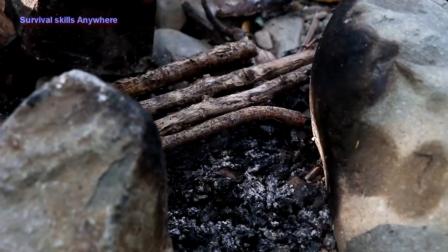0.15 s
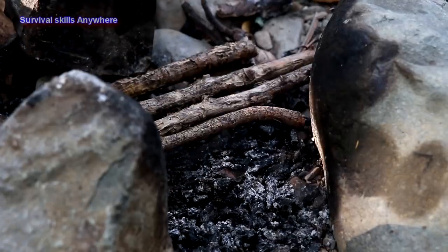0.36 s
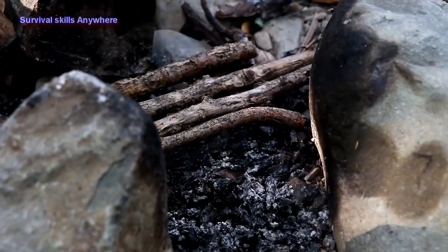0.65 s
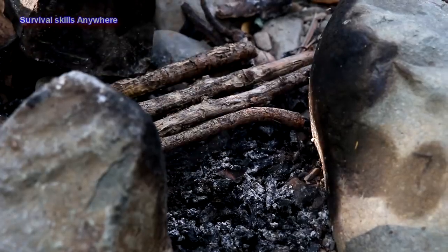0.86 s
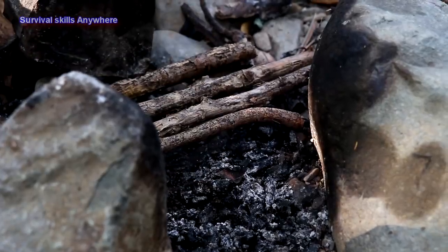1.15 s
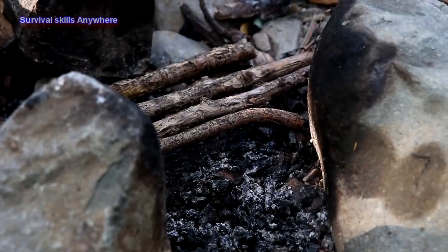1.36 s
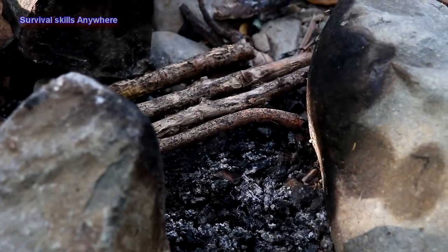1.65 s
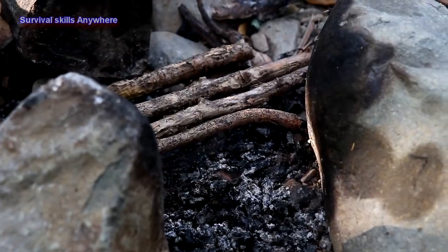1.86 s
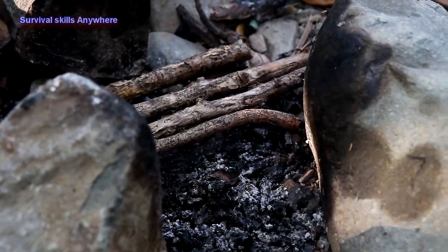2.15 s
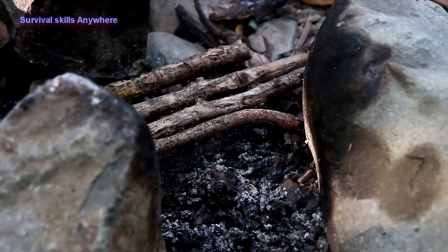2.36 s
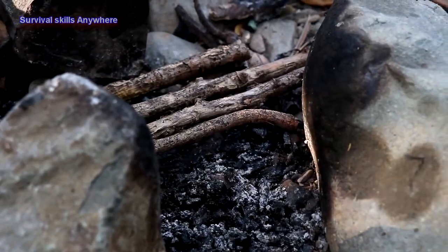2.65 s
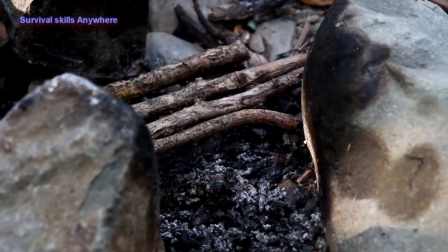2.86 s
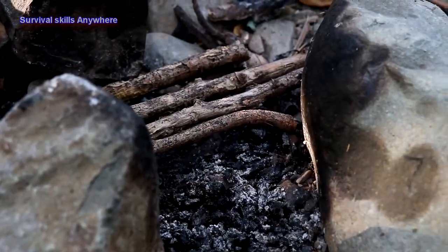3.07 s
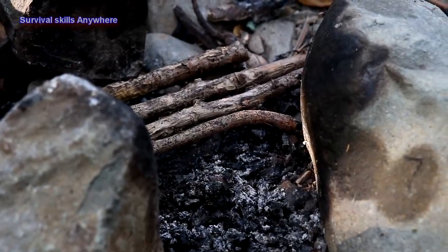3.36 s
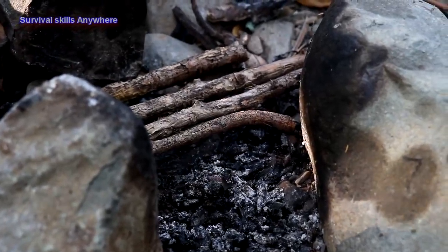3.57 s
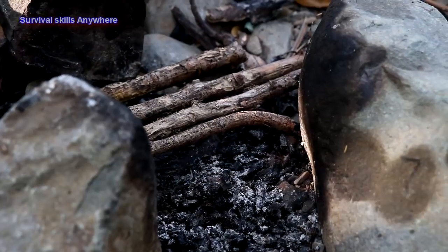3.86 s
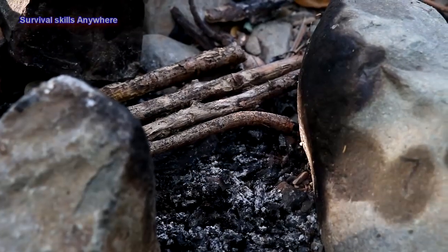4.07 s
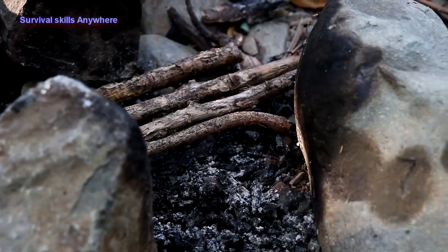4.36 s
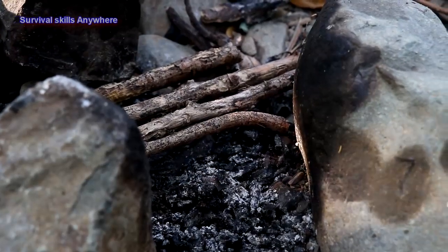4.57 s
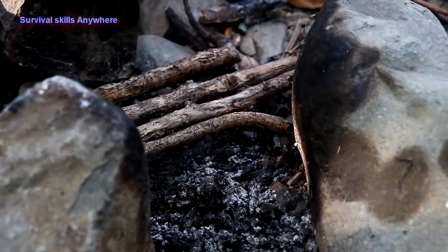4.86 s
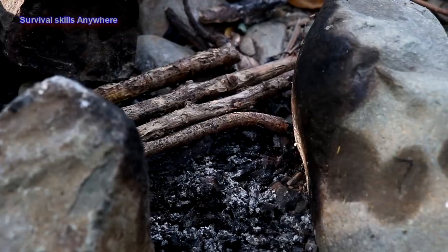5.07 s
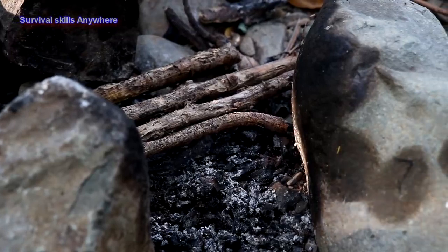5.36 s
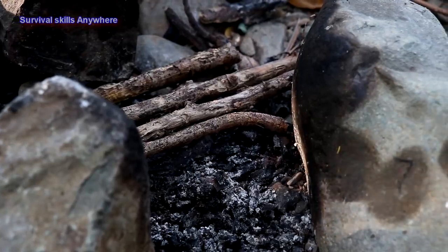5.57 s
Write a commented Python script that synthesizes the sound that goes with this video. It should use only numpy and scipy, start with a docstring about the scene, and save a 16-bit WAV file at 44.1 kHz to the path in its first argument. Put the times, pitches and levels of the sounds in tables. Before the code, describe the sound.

Outdoors among rocks, brittle wood snaps loudly in clusters, bark scrapes briefly, and water hisses almost inaudibly in the distance.

```python
"""Stone fire pit among rocks and trees, a stream faint behind: dry sticks snap and knock near the microphone.
Snap: a first fracture and milliseconds of tearing-fibre noise, through the stick's damped resonances.
Rocks and trees return a decaying noise tail; at the loudest snap the microphone overloads with a low thump.
Bark rubs as random catches, settling wood taps as dying noise bursts. The water is shaped noise, over a drone
of wavering noise bands; a wind filter thins the lows of both after the loudest snap, then lets them back."""
import sys
import numpy as np
from scipy import signal
from scipy.fft import rfft, irfft
from scipy.io import wavfile
from scipy.ndimage import uniform_filter1d

SR = 44100
rng = np.random.default_rng(int(sys.argv[2]) if len(sys.argv) > 2 else 0)


def wrap_up_sound(samples):
    """Save the sound to the file named by the first command line argument, as 16-bit audio."""
    columns = np.atleast_2d(samples).T
    # keep every value between -1 and 1, then stretch to whole-number steps
    tamed = np.clip(columns, -1, 1)
    steps = np.round(tamed * 32767).astype(np.int16)
    wavfile.write(sys.argv[1], SR, steps)


N = 252693

# stream spectrum, shape only: f/Hz, density/dB per Hz
STREAM_SPECTRUM = [(25, -21), (70, -16), (150, -15), (250, -3.5), (380, -11.5), (500, -2), (630, -10),
                   (800, -3), (1450, -4.5), (2100, -8), (3200, -9), (5000, -17.5), (8300, -17),
                   (12000, -22.5), (16000, -24)]
# stream level and the recorder's wind filter: t/s, level before low cut/dB, low-cut gain/dB
STREAM_LEVELS = [(0, -67.5, -2.5), (.8, -66, 0), (2.2, -66.5, 0), (2.4, -68, -11.5), (2.8, -68, -19.5),
                 (3.8, -67, -24.5), (4.3, -66.5, -4), (5.73, -67, -3.5)]
# left-right correlation of the stream: f/Hz, correlation/1
STREAM_LIKENESS = [(60, .65), (290, .8), (640, 0.59), (1400, .33), (3100, -0.045), (7000, -.1),
                   (15000, -0.75)]
# drone bands: centre f/Hz, -6 dB width/Hz, level at 0 dB low-cut gain/dB, dB per dB of low-cut gain/1
DRONE_BANDS = [(105, 21, -87.5, 2.2), (226, 45, -83.5, 1.1)]
# bark spectrum, shape only: f/Hz, gain/dB
BARK_SPECTRUM = [(100, -30), (800, -18), (2000, -6), (3500, -1), (6500, -0.5), (9000, -6), (15000, -15.5)]
# strokes of bark on bark: t of height/s, level at height/dB, swell/s, fade/s
BARK_STROKES = [(.52, -71.5, 0.09, 0.15), (1.135, -62, 0.11, .06), (1.44, -68.5, .06, .03),
                (1.66, -74, .06, .05), (1.986, -45, 0.034, 0.043), (2.539, -44, 0.031, .008),
                (3.889, -40, 0.011, .045), (4.195, -63.5, 0.087, 0.076), (4.58, -70, .17, .07),
                (4.878, -42, .014, .018), (5.36, -72, 0.094, 0.11), (5.48, -66, 0.093, .09)]
# taps of wood settling among stones: t/s, level before decay and high-pass/dB, f/Hz, -6 dB width/Hz, decay/s
WOOD_TAPS = [(.098, -61, 870, 250, 0.0085), (.191, -57, 1620, 350, 0.0065), (.73, -61.5, 920, 400, .0086),
             (1.2, -58, 1000, 3000, .0086), (1.292, -46.5, 1200, 1290, .011),
             (1.305, -58.5, 2200, 3200, .02), (1.2913, -45, 2730, 1810, 0.0085),
             (1.2926, -27, 3800, 3000, 0.0012), (1.747, -60.5, 3480, 600, 0.0043),
             (1.82, -63.5, 990, 400, 0.017), (3.584, -62, 987, 503, 0.012), (5.301, -60, 4500, 7000, .0046),
             (5.361, -63, 784, 303, .012), (5.484, -58, 1500, 3484, 0.0073)]
# snaps: t/s, energy as level over 10 ms/dB, tearing time/s, low mode f/Hz, middle mode f/Hz, its lift/dB,
# top mode f/Hz, its lift/dB, thud/dB, knock/dB, brightness/dB (these three set the body curve), echo send/dB
STICK_SNAPS = [(1.9315, -23, .002, 2300, 4620, 12.5, 7340, 5, -28.5, -7.5, -8.5, -20.5),
               (1.9344, -27, .005, 2250, 4370, 4, 8350, 8, -26, 1, -3.5, -19),
               (1.9765, -19, .003, 1410, 3250, 9, 8220, 9, -16, -4.5, -8, -20),
               (1.9991, -42, .0013, 2390, 4200, 5, 7050, 6, -22.5, -9.5, -2, -19.5),
               (2.2264, -15.5, .0036, 1400, 5250, 3, 6800, 7.5, -13, -7.5, -5.5, -19.5),
               (2.4052, -52.5, .0052, 2310, 3510, 4, 5750, -1, -38, -4, 3.5, -13),
               (2.5133, -44.5, .005, 2180, 4760, 14.5, 8380, 11.5, -28, -27.5, 1.5, -22),
               (2.5267, -31, .0037, 2390, 2810, 11, 6900, 13.5, -28, -18, 1, -19.5),
               (2.5317, -23.5, .001, 2020, 4600, 0, 7850, 20.5, -15, -7, -11, -33),
               (2.536, -28.5, .004, 2380, 2710, 9, 7410, 19, -14, -7.5, -0.5, -22.5),
               (3.0049, -58.5, .0086, 2250, 2780, 13, 5020, 10, -6.5, -8, -10, -19),
               (3.038, -51, .004, 1264, 3030, 14, 7280, 10, -7, 5.5, -7, -18),
               (3.8493, -46.5, .002, 1930, 2800, 7.5, 7300, 4.5, -19.5, 0, -5, -19),
               (3.8543, -44, .003, 1980, 2840, 13.5, 5020, 7, -26.5, -1, 0, -23),
               (3.882, -17.5, .0033, 1970, 3570, 8.5, 6800, 5, -22, -6.5, -13.5, -20),
               (3.892, -32, .0055, 2350, 2730, 9, 7320, 4.5, -25, -6, -8.5, -20.5),
               (3.9037, -39.5, .003, 2390, 3250, 5, 6760, 7, -27.5, -11.5, -5, -19),
               (3.9157, -25.5, .0033, 2110, 6800, 7, 8200, 12.5, -25.5, -5, -6, -19),
               (3.9508, -16.5, .0045, 1410, 3830, 13, 5640, 2.5, -16, -3, -5, -18.5),
               (3.969, -23.5, .0015, 1957, 4454, 4, 6760, 8.5, -20, -7, -12.5, -18),
               (3.9958, -23.5, .0022, 1980, 2750, 5, 5600, 8, -18, -8, -7.5, -23),
               (4.1692, -54, .0025, 1920, 3810, 8.5, 5860, 8, -8, -22, -16, -16),
               (4.143, -62.5, .002, 1230, 5000, 4, 5840, 7, -12, -10, -20, -20),
               (4.2641, -34, .0017, 1950, 4240, 7.5, 5850, 12, -35, -12, -7, -28),
               (4.278, -51, .0013, 1830, 4540, 7.5, 5870, 12, -22, -14, -6, -19),
               (4.288, -39.5, .0016, 1870, 3170, 5.5, 7480, 14, -33, -15, -4.5, -16),
               (4.3032, -19.5, .0026, 1137, 3190, 10, 5400, 11, -35.5, -9, -8, -27),
               (4.4149, -59, .002, 1140, 4590, 6.5, 5810, 6.5, -15.5, -4, -16, -22),
               (4.819, -53, .0019, 1440, 4250, 12, 7110, 18, -19.5, -13, -5, -14),
               (4.8758, -38.5, .0066, 2000, 4250, 13, 7200, 13, -21.5, -13, -13, -27),
               (4.9148, -53, .0029, 1230, 4600, 1, 6870, 19, -11, -9, -1, -12),
               (5.0068, -59.5, .0025, 2340, 3240, 16, 6460, 12, -15, -15, -13, -24),
               (5.084, -52.5, .0023, 1970, 3570, 14.5, 5320, 8.5, -13, -7, -6.5, -18)]
# resonances common to all sticks: f/Hz, half-power width/Hz, lift/dB
WOOD_MODES = [(1270, 220, 4.5), (2000, 120, 3.5), (2850, 90, 4), (3270, 80, 3.5), (3770, 99, -3),
              (4400, 360, 6), (5650, 140, 2.5), (6980, 250, 4.5), (7920, 260, 4.5)]
# level difference between the microphone's two ports: f/Hz, left minus right/dB
PORT_BALANCE = [(1000, 1.5), (3000, -0.5), (7000, -1.5), (9500, -3.5), (12500, 3.5), (15000, 6.5)]
# echo spectrum, shape only: f/Hz, gain/dB
ECHO_SPECTRUM = [(100, -31), (700, -23), (1500, -12.5), (3000, -1), (5000, 0.5), (8000, -2), (10500, -8.5),
                 (15000, -9)]
# echo decay: f/Hz, time to fall 60 dB/s
ECHO_DECAY = [(300, .25), (3000, 0.27), (8000, .31), (15000, 0.33)]

STROKE_DROP_DB = -20  # one swell before and one fade after the height
HANDLING_DB = -87.5  # steady rustle under the strokes
SPLINTER_DB, SPLINTER_FADE_DB_PER_S = -26.5, -150  # re its snap; further drop with delay
SPLINTER_MEAN_GAP_S, SPLINTER_TEAR_S = 0.0074, .002
CEILING, EDGE_HZ = .66, 16100


def amp(db):
    """dB to amplitude ratio."""
    return 10 ** (np.asarray(db) / 20)


def unit(x):
    """Scales to rms 1."""
    return x / np.sqrt(np.mean(x ** 2) + 1e-20)


def read(points, hz):
    """Interpolates a table on a log-frequency axis."""
    f, value = np.transpose(points)
    return np.interp(np.log(hz + 1), np.log(f + 1), value)


def add(mix, s, sound):
    """Mixes a sound in at a time."""
    part = mix[:, round(s * SR):][:, :sound.shape[1]]
    part += sound[:, :part.shape[1]]


def causal(gain):
    """Minimum-phase response of a gain curve: sharp start, peaks ring on."""
    log_gain = np.log(np.maximum(gain, 1e-6))
    circle = np.concatenate([log_gain, log_gain[..., -2:0:-1]], -1)
    return np.exp(np.conj(signal.hilbert(circle)))[..., :gain.shape[-1]]


def stream(patchy_db=2.0, size=1024, low_cut_hz=330):
    """Running water: noise with drifting patches, its lows thinned by the wind filter's low cut."""
    hop = size // 4
    frames, hz = N // hop + 5, np.fft.rfftfreq(size, 1 / SR)
    a, b, c, d, patches = rng.standard_normal((frames, len(hz), 5)).T
    patches = uniform_filter1d(patches, size=10, axis=0)
    patches = unit(uniform_filter1d(patches, size=10, axis=1))

    same = np.clip(read(STREAM_LIKENESS, hz), -1, 1)[:, None]
    left = a + 1j * b
    right = same * left + np.sqrt(1 - same ** 2) * (c + 1j * d)
    z = np.array([left, right]) * amp(read(STREAM_SPECTRUM, hz)[:, None] + patchy_db * patches)
    water = unit(signal.istft(z, nperseg=size, noverlap=size - hop)[1][:, :N])

    low = irfft(rfft(water) / (1 + (np.fft.rfftfreq(N, 1 / SR) / low_cut_hz) ** 4), N)
    s, *columns = np.transpose(STREAM_LEVELS)
    level_db, low_cut_db = (np.interp(np.arange(N) / SR, s, column) for column in columns)
    balance = amp([[-.5], [.5]])
    return amp(level_db) * (water + (amp(low_cut_db) - 1) * low) * balance


def drone(waver_db=2, waver_hz=3):
    """Narrow noise bands that swell and fade at random, thinned along with the lows by the wind filter."""
    hz, t = np.fft.rfftfreq(N, 1 / SR), np.arange(N) / SR
    s, _, low_cut_db = np.transpose(STREAM_LEVELS)
    low_cut_db = np.interp(t, s, low_cut_db)
    out = np.zeros(N)
    for centre_hz, width_hz, db, follow in DRONE_BANDS:
        band_gain = 1 / (1 + (2 * (hz - centre_hz) / width_hz) ** 4)
        band = unit(irfft(rfft(rng.standard_normal(N)) * band_gain, N))
        swell = unit(irfft(rfft(rng.standard_normal(N)) * np.exp(-(hz / waver_hz) ** 2), N))
        out += amp(db + follow * low_cut_db) * unit(band * amp(waver_db * swell))
    return out


def rubbing(grain_db=1.0, per_s=3000, snag_per_s=90, snag_db=14, shared_gain=1.9):
    """Tiny catches of rough bark and rarer, larger snags; each stroke swells to its height and fades."""
    catches = rng.standard_normal((3, N)) * (rng.random((3, N)) < per_s / SR)
    catches *= amp(grain_db * np.minimum(rng.exponential(1, (3, N)), 4))
    catches[0] += amp(snag_db) * rng.uniform(-1, 1, N) * (rng.random(N) < snag_per_s / SR)
    sides = catches[1:] + shared_gain * catches[0]  # row 0 reaches both sides
    colour = causal(amp(read(BARK_SPECTRUM, np.fft.rfftfreq(2 * N, 1 / SR))))
    grains = irfft(rfft(sides, 2 * N) * colour)[:, :N]

    t, power = np.arange(N) / SR, amp(HANDLING_DB) ** 2
    for s, db, swell_s, fade_s in BARK_STROKES:
        away = np.minimum(np.maximum((s - t) / swell_s, (t - s) / fade_s), 10)
        power = power + amp(db + STROKE_DROP_DB * away) ** 2
    return unit(grains) * np.sqrt(power)


def taps(bass_cut_hz=480, attack_s=0.00066):
    """Short dying noise bursts around one resonance; light wood gives almost no bass."""
    out, t, hz = np.zeros((2, N)), np.arange(4096) / SR, np.fft.rfftfreq(4096, 1 / SR)
    for s, db, tap_hz, width_hz, decay_s in WOOD_TAPS:
        resonance = 1 / (1 + (2 * (hz - tap_hz) / width_hz) ** 2)
        ring = irfft(rfft(rng.standard_normal(len(t))) * resonance)
        fade = np.exp(-t / decay_s) * (1 - np.exp(-t / attack_s))
        add(out, s, amp(db) * unit(ring * fade)[None] * np.sqrt(np.mean(fade ** 2)))
    return signal.sosfilt(signal.butter(2, bass_cut_hz, "high", fs=SR, output="sos"), out)


def mode(hz, centre_hz, width_hz, lift_db):
    """Power that one damped resonance adds."""
    return (amp(lift_db) ** 2 - 1) / (1 + (2 * (hz - centre_hz) / width_hz) ** 2)


def snap(row, size=4096, alike=0.34, low_alike=0.36, fracture=5.6, after_db=-21, after_s=0.008,
         grain_db=3.5, pan_db=-0.4):
    """A first fracture, then a run of tearing fibres, through the stick's resonances: (direct, scattered)."""
    (_, db, tear_s, low_hz, mid_hz, mid_db, top_hz, top_db,
     thud_db, knock_db, bright_db, echo_db) = row
    t, hz = np.arange(size) / SR, np.fft.rfftfreq(size, 1 / SR)
    tear_s = max(tear_s, .0006)

    run = np.exp(-(t / (0.87 * tear_s)) ** 2)
    run += amp(after_db) * np.exp(-t / after_s) * np.sqrt(tear_s / 0.0031)
    # fibres give way in bunches
    clumps = amp(grain_db * unit(uniform_filter1d(rng.standard_normal(size), size=24)))
    fibres = rng.standard_normal((3, size)) * run * unit(clumps)
    fibres[0, 0] += fracture
    z = rfft(fibres)
    # low tones reach both ports more alike; short waves differ
    shared = np.clip(alike + low_alike / (1 + (hz / 2200) ** 2), 0, 1)
    z = np.sqrt(shared) * z[0] + np.sqrt(1 - shared) * z[1:]
    # flatten: the stick alone sets the broad colour
    z /= causal(np.sqrt(uniform_filter1d(abs(z) ** 2, size=90, axis=1) + 1e-12))

    body_db = read([(30, thud_db - 8.0), (200, thud_db), (650, thud_db + 2.5),
                    (1150, knock_db - 5.5), (2200, knock_db - 1.5), (2900, -0.41), (8000, -2),
                    (10800, bright_db + 3), (15000, bright_db - 4.0)], hz)
    width_hz = 0.59 / tear_s  # a brief crack is a broad one
    own = mode(hz, low_hz, 200, lift_db=9.5)
    own += mode(hz, mid_hz, width_hz, mid_db)
    own += mode(hz, top_hz, 2.5 * width_hz, top_db)
    rings = abs(1 + own + sum(mode(hz, *m) for m in WOOD_MODES))  # power
    ports = amp((pan_db + read(PORT_BALANCE, hz)) * np.array([[1], [-1]]) / 2)

    level = np.sqrt(SR / 100 / size) * amp(db)  # energy referred to 10 ms
    direct = irfft(z * causal(amp(body_db) * np.sqrt(rings) * ports))
    direct = unit(direct * np.exp(-(t / .03) ** 4))
    # leaving in all directions averages notches and peaks out
    scattered = unit(irfft(causal(amp(0.3 * body_db) * rings ** .18)))
    return level * direct, level * amp(echo_db) * scattered[None]


def sticks(count=3):
    """Snaps, each with splinters letting go ever weaker: (direct, sent into the surroundings)."""
    direct, sent = np.zeros((2, 2, N))
    for row in STICK_SNAPS:
        s, db, _, *stick = row
        near, scattered = snap(row)
        add(direct, s, near)
        add(sent, s, scattered)
        for delay_s in np.cumsum(SPLINTER_MEAN_GAP_S * (.5 + rng.random(count))):
            splinter_db = db + SPLINTER_DB + SPLINTER_FADE_DB_PER_S * delay_s
            splinter = (s + delay_s, splinter_db, SPLINTER_TEAR_S, *stick)
            add(direct, s + delay_s, snap(splinter)[0])
    return direct, sent


def surroundings(x, build_s=.012, uneven_db=4, early_gain=0.73, early_s=0.0092):
    """Rocks and trees return a thin, bright, decaying noise tail, different on each side."""
    t = np.arange(SR // 2) / SR
    scatter = rng.standard_normal((2, len(t))) * amp(uneven_db * rng.standard_normal((2, len(t))))
    scatter *= 1 - np.exp(-(t / build_s) ** 2)
    hz, at_s, z = signal.stft(scatter, SR, nperseg=256)
    z *= amp(-60 * at_s / read(ECHO_DECAY, hz)[:, None])
    z *= amp(read(ECHO_SPECTRUM, hz))[:, None] * (1 + early_gain * np.exp(-at_s / early_s))
    tail = signal.istft(z, SR, nperseg=256)[1]
    return signal.fftconvolve(x, tail / np.linalg.norm(tail[0]), axes=1)[:, :N]


def overload(s=2.2261, thump_db=-12.0, left_db=-15, dip_s=0.00048, swing_s=.002, swing_db=-4,
             bend_hz=980, bend_db=-19, bend_s=0.0011):
    """The microphone overloads at the loudest snap: a low lopsided thump, mostly right; with it rings the
    stick's lowest bending mode."""
    t = np.arange(SR // 20) / SR
    thump = -t / dip_s * np.exp(1 - t / dip_s)
    thump += amp(swing_db) * (t / swing_s) ** 3 * np.exp(1.5 * (1 - (t / swing_s) ** 2))
    thump = signal.sosfilt(signal.butter(1, 40, "high", fs=SR, output="sos"), thump)
    bend = -amp(bend_db) * np.sin(2 * np.pi * bend_hz * t) * np.exp(-t / bend_s)
    out = np.zeros((2, N))
    add(out, s, amp(thump_db) * thump * amp([[left_db], [0]]) + bend)  # bend equal on both sides
    return out


def scene():
    """Water and drone, bark and taps, then the close sticks with their echo and the overload."""
    background = stream() + drone()
    handling = rubbing() + taps()
    direct, sent = sticks()
    return background + handling + direct + surroundings(sent) + overload()


def record(dry):
    """Peaks rounded off below a ceiling, then a steep low-pass."""
    rounded = dry / (1 + (dry / CEILING) ** 4) ** .25
    low_pass = signal.firwin(255, EDGE_HZ, window=("kaiser", 9), fs=SR)
    return signal.oaconvolve(rounded, low_pass[None], "same")


dry = scene()
out = record(dry)
wrap_up_sound(out)
```